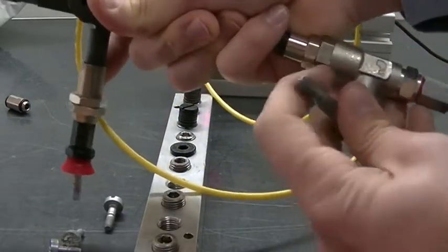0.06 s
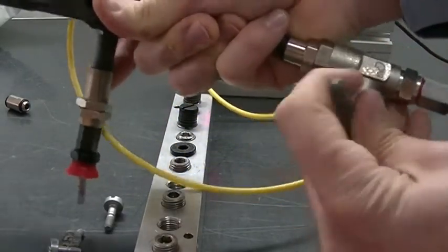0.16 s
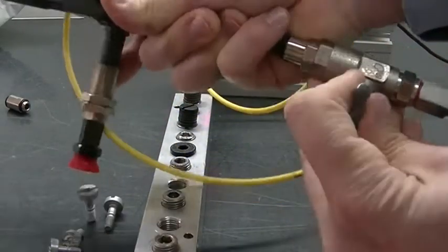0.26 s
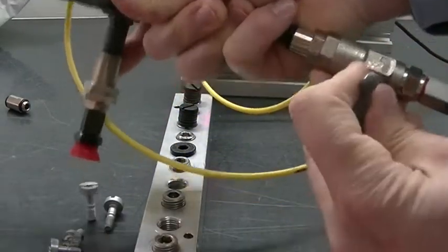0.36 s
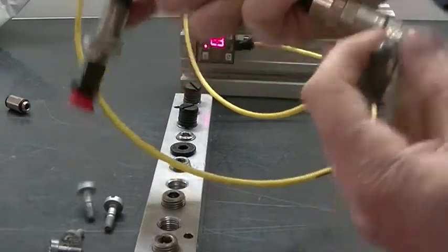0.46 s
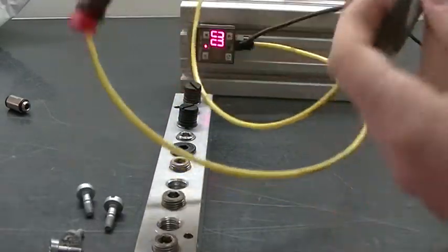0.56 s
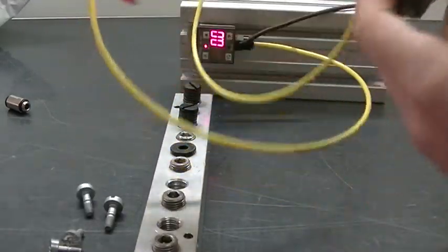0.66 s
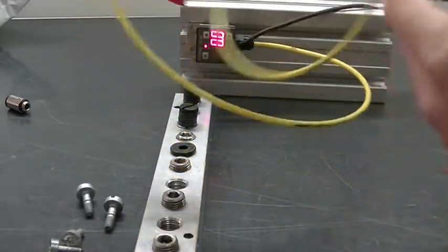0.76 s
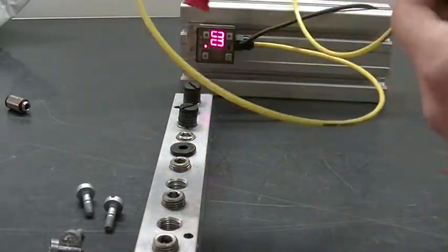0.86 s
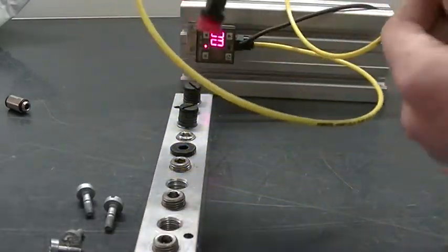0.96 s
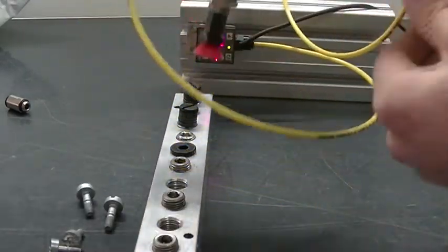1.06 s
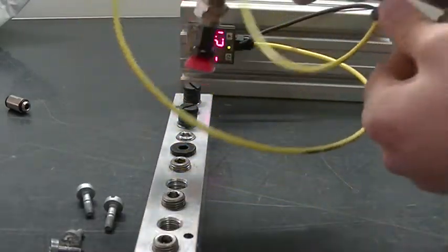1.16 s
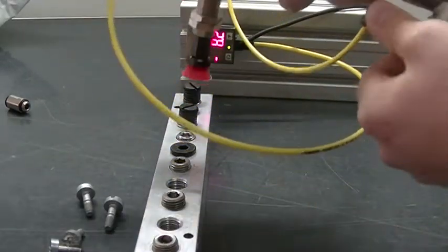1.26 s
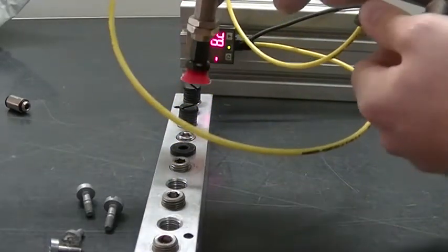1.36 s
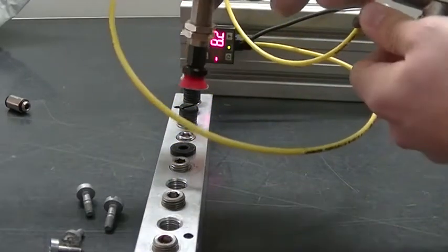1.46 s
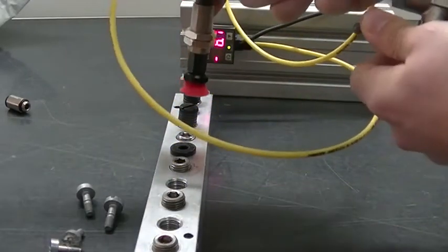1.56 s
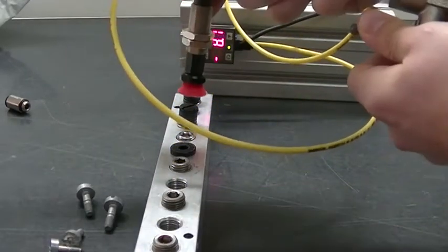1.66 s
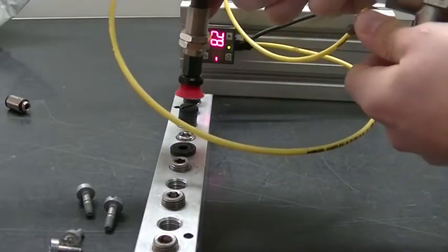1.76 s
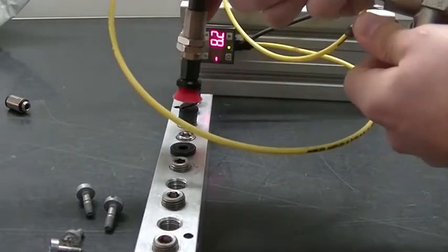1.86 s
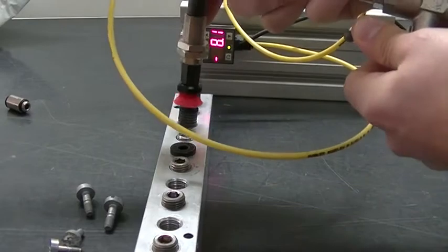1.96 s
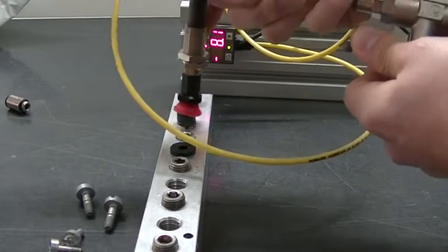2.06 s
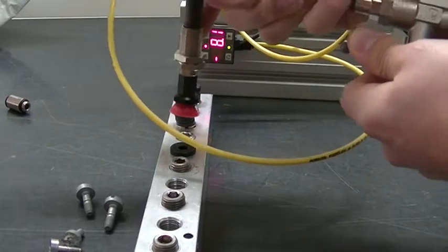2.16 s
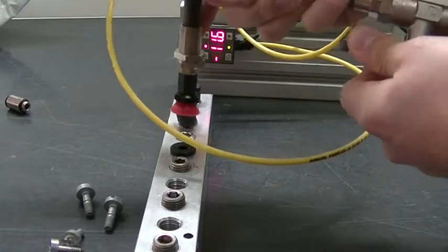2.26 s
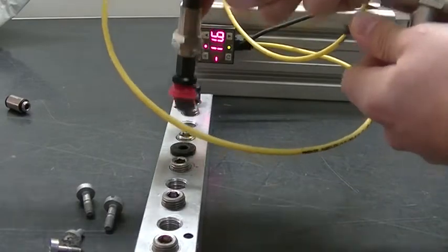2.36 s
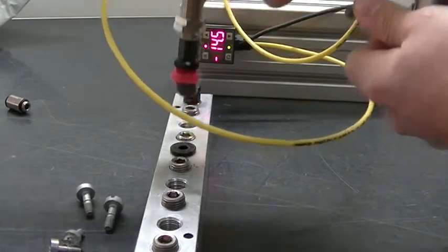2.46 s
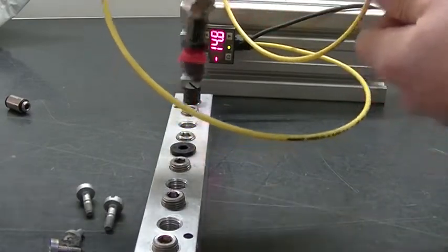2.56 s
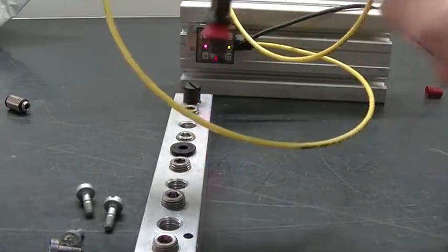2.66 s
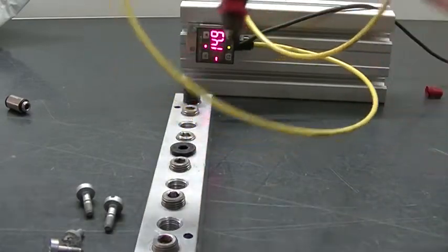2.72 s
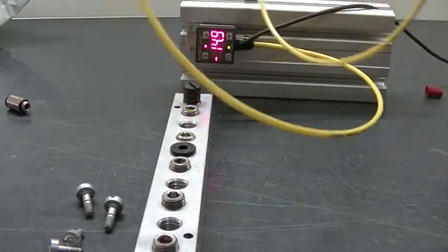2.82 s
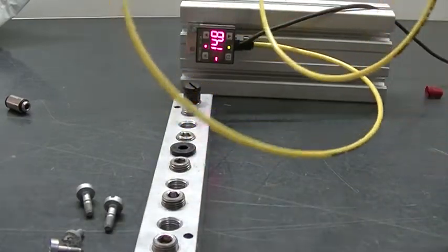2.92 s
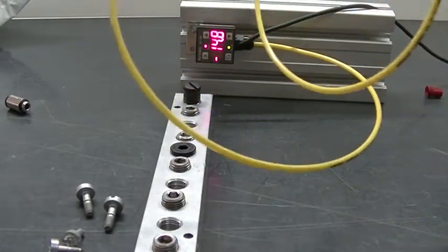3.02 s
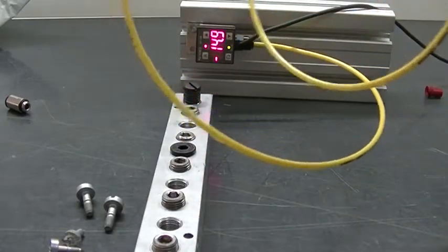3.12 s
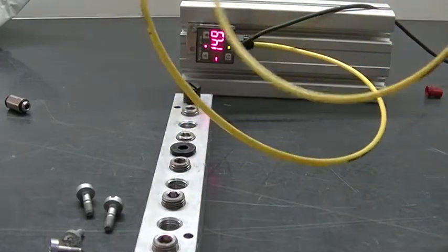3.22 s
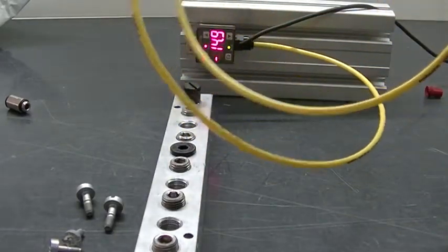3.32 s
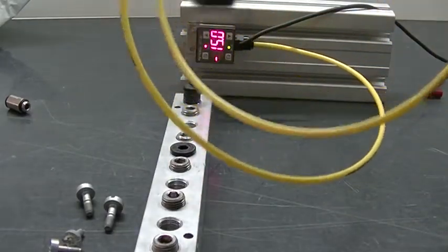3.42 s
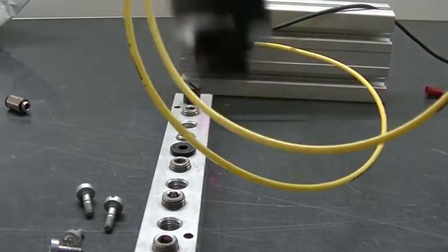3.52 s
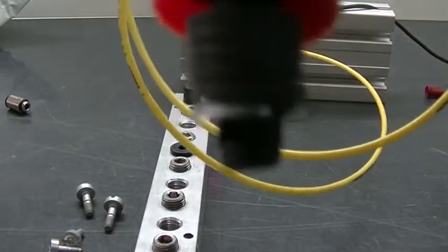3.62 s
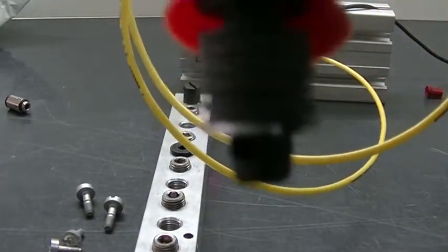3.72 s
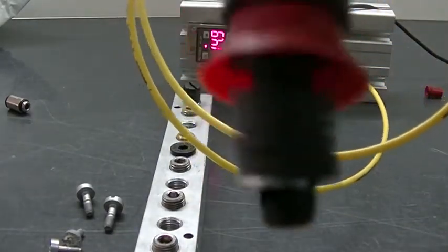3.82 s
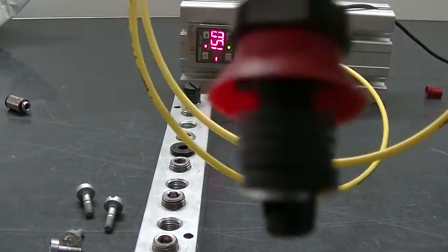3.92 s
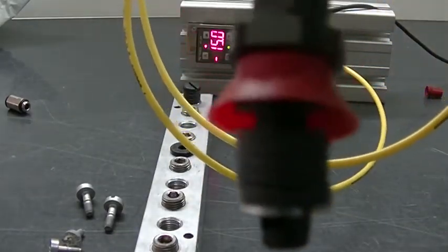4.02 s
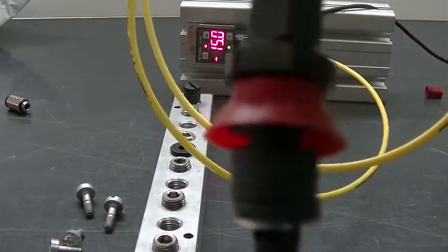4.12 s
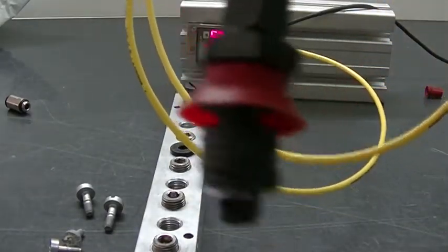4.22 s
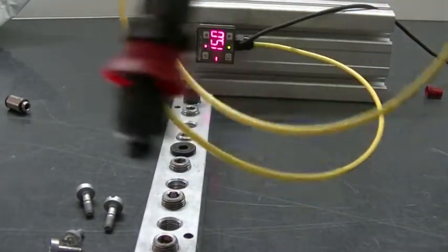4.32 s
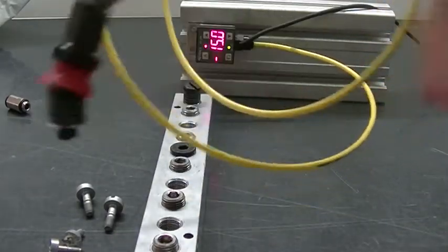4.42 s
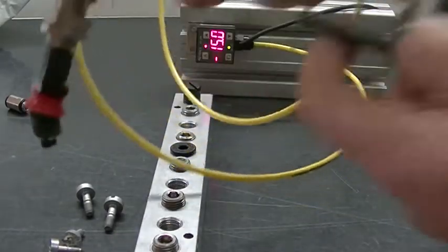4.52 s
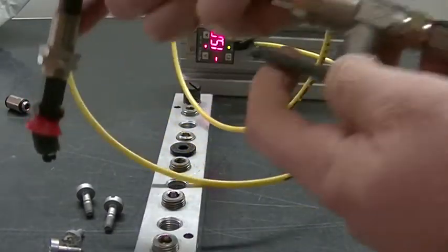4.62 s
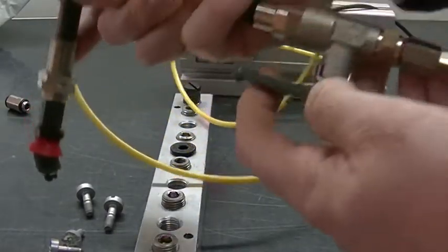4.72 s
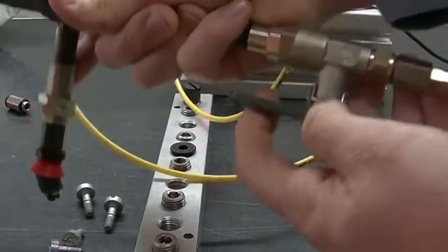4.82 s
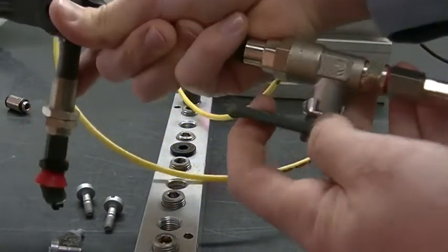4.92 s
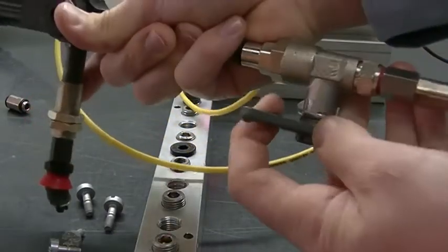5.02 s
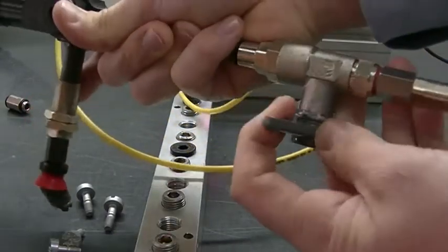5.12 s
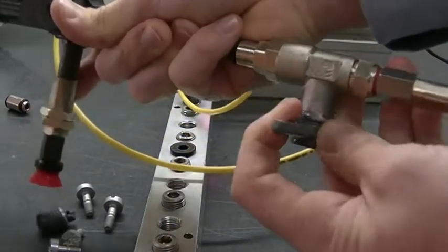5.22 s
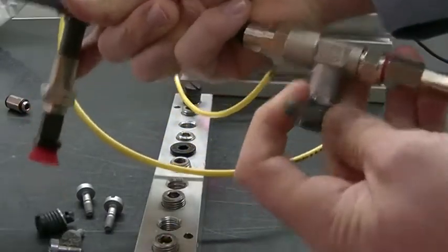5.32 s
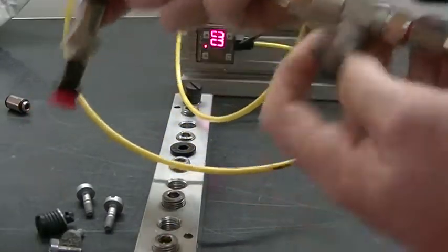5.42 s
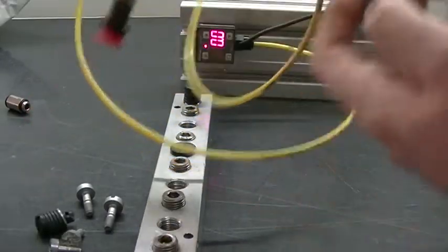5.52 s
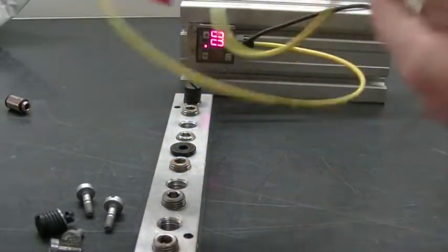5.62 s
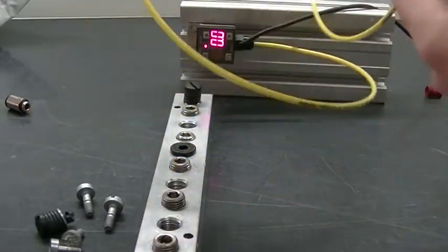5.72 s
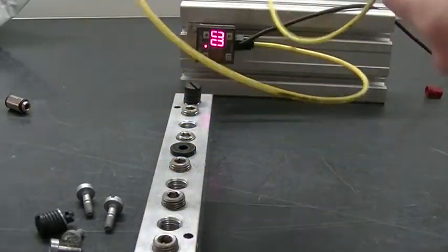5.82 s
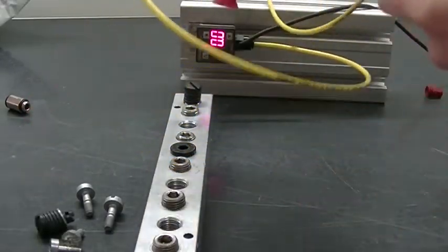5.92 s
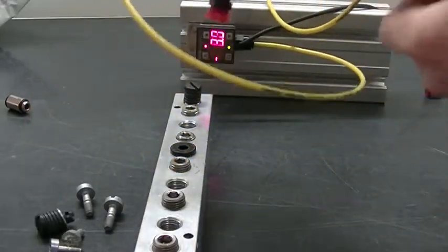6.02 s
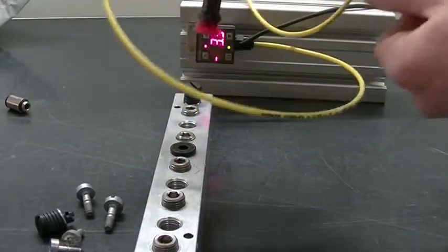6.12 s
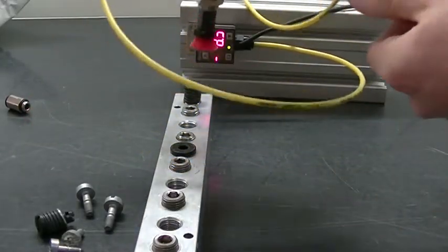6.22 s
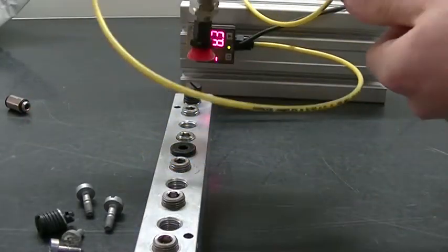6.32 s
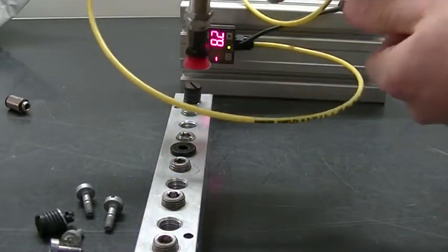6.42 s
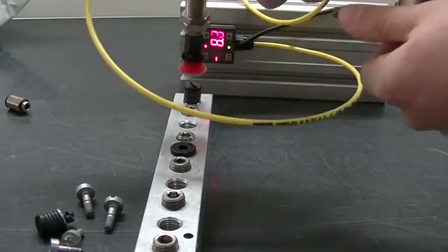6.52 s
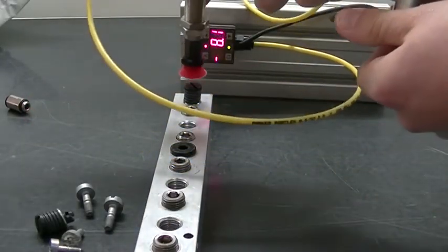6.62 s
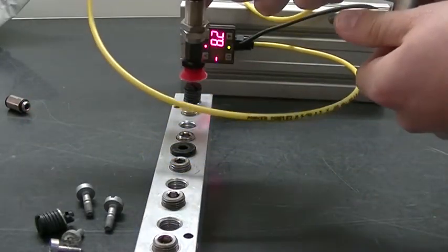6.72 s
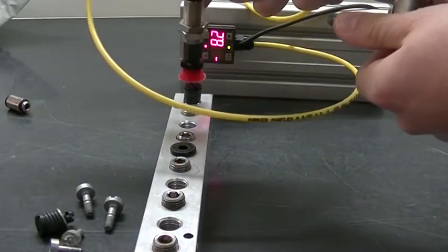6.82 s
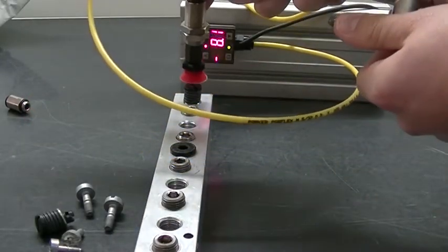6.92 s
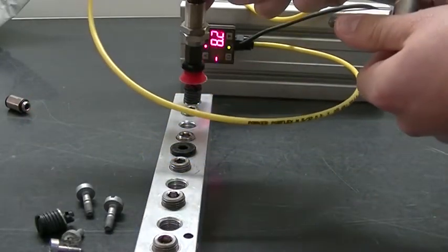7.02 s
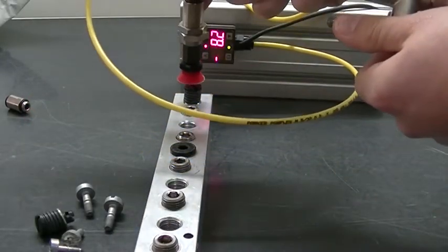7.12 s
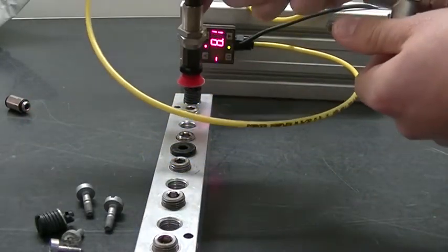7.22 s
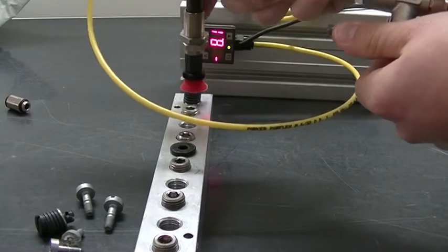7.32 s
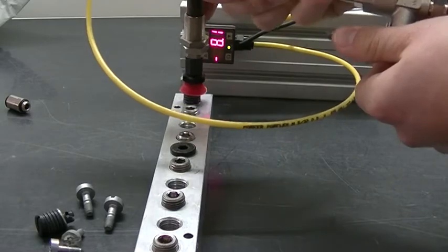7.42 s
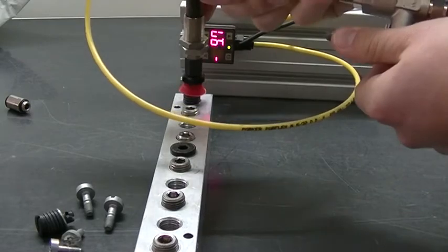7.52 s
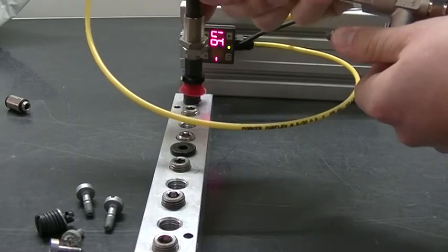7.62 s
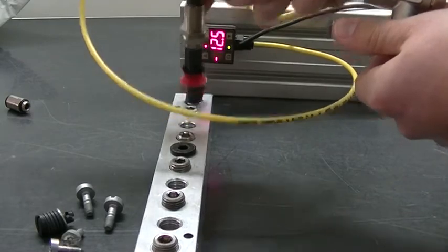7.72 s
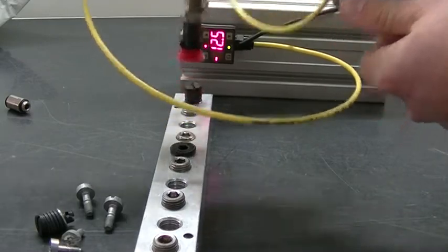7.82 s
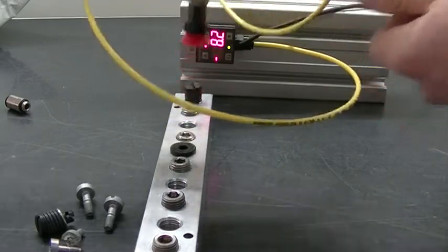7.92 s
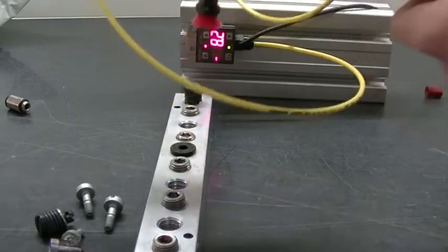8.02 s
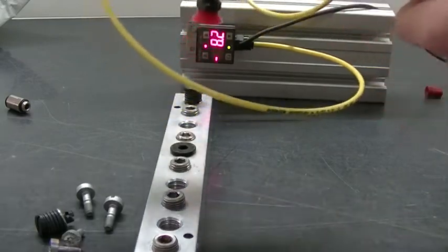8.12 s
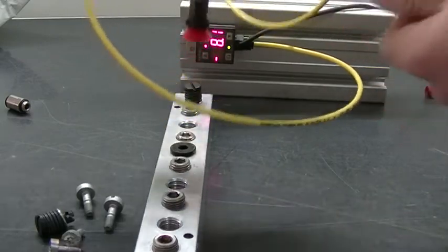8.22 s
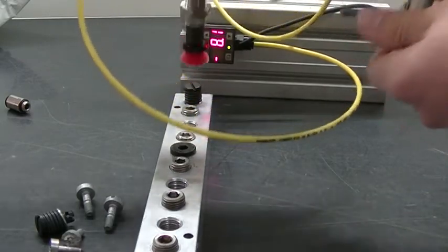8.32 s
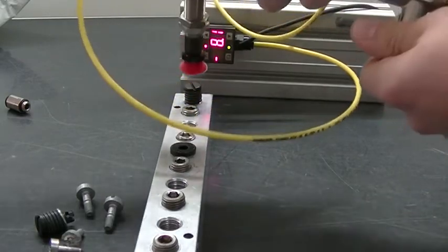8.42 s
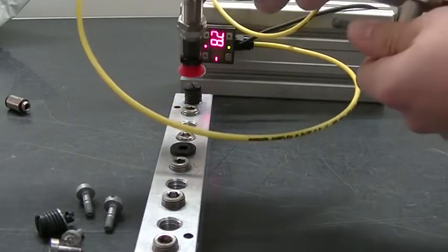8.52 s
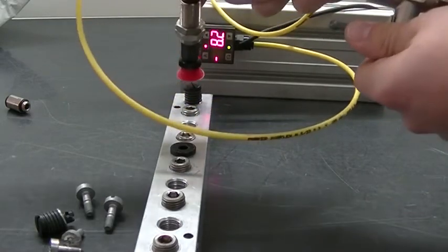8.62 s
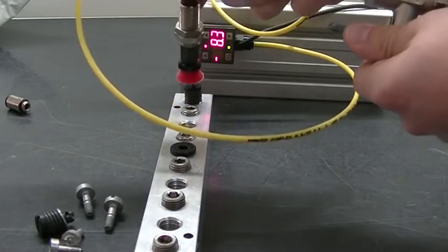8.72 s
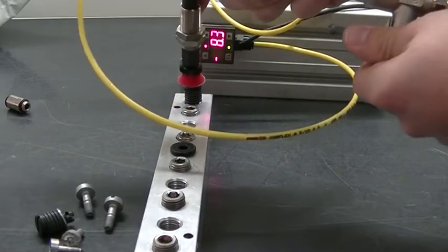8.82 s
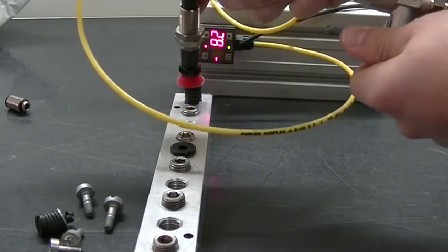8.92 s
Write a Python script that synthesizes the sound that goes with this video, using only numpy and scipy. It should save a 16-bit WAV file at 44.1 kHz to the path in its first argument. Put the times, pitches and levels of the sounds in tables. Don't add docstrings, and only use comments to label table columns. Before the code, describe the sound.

A loud, harsh compressed-air hiss is already blowing and chokes off at about 0.15 s. A small hard part cracks on the bench at 0.24 s with a soft bounce, a second at 0.49 s. Room ring fades into low ventilation rumble and faint mains hum, with tiny valve ticks from 0.6 to 0.8 s. At 1 s the jet bursts open with a bright spit and blows steadily, its tone sliding in hollow comb-like sweeps. Around 2.1 s it tightens with a slight squeak; from 3.4 to 4.2 s thin, airy treble swells very close, then recedes. It shuts with a metallic snap near 5.07 s; a part knocks at 5.19 s and bounces quickly. Fittings tick brightly at 5.5 to 5.85 s. At 5.95 s the hiss bursts back, shifts briefly at 7.4 to 7.6 s, brightens near 8.1 s and continues to the end.

```python
import sys
import numpy as np
from scipy import signal
from scipy.fft import rfft, irfft, next_fast_len
from scipy.io import wavfile
from scipy.ndimage import uniform_filter1d

SR = 44100
rng = np.random.default_rng(int(sys.argv[2]) if len(sys.argv) > 2 else 0)


def wav_out(sig):
    wavfile.write(sys.argv[1], SR, np.round(np.clip(np.atleast_2d(sig).T, -1, 1) * 32767).astype(np.int16))


def ratio(d):
    e = np.asarray(d, float) / 20
    return 10 ** e


N = 395577
M = next_fast_len(N)
T = np.arange(N) / SR

# opens_s, rise_s, shuts_s, fall_s
VALVE = [
    (-1, .01, .155, .006),
    (.987, .016, 5.076, .008),
    (5.949, .016, 10, .01),
]
# start_s, hand_delay_ms, hand_share, bench_delay_ms, block_delay_ms
CARRY = [(0, 0.37, 0.04, 2.47, 2.1), (.98, 0.43, .27, 2.4, 1.94), (1.3, 0.34, 0.25, 2.2, 2.16),
         (2.1, 0.32, 0.13, 2.22, 1.9), (2.62, 0.38, 0.21, 2.5, 2.02), (3.0, 0.6, .28, 2.85, 1.74),
         (3.35, 0.89, 0.15, 3.66, 1.8), (3.7, 1.07, 0.16, 4.1, 1.9), (4.15, 1.07, 0.14, 4.1, 1.97),
         (4.4, 0.67, 0.087, 3.5, 1.8), (4.7, 0.36, .18, 2.6, 2.3), (5.08, 0.23, 0.35, 2.57, 2),
         (5.95, 0.44, 0.29, 1.79, 1.67), (6.5, 0.32, 0.16, 1.94, 1.9), (7.65, 0.31, 0.05, 1.95, 1.75),
         (8.1, 0.44, 0.39, 2.4, 2.45), (8.45, 0.35, 0.26, 2.11, 2.01), (8.97, 0.3, 0.15, 2.21, 1.83)]


def unit(x):
    return x / np.sqrt(np.mean(x ** 2))


def curves(tables):
    s, *columns = np.concatenate(tables).T
    return [np.interp(T, s, column) for column in columns]


def log_curve(points, size):
    hz, value = np.transpose(points)
    return np.interp(np.log(np.fft.rfftfreq(size, 1 / SR) + 1), np.log(hz), value)


def colour(x, points):
    return irfft(rfft(x, M) * ratio(log_curve(points, size=M)), M)[:N]


def split(x, edges_hz):
    octave = np.log2(np.fft.rfftfreq(M, 1 / SR) + 1)
    spectrum = rfft(x, M)
    slopes = [np.clip(.5 - (octave - np.log2(hz)) / .3, 0, 1) for hz in edges_hz]
    below = [0] + slopes + [1]
    return [irfft(spectrum * (hi - lo), M)[:N] for lo, hi in zip(below, below[1:])]


def late(x, ms):
    return np.interp(np.arange(N) - ms * SR / 1000, np.arange(N), x)


def walk(rate_hz):
    hold = int(SR / rate_hz)
    steps = np.repeat(rng.standard_normal(N // hold + 1), hold)
    return unit(uniform_filter1d(uniform_filter1d(steps, hold), hold)[:N])


def pan(db):
    return ratio(np.array([db / 2, -db / 2]))


def mid_side(side):
    return side * np.array([[1], [-1]])


def ring(t, hz, t60_s):
    return np.sin(2 * np.pi * hz * t) * np.exp(-np.log(1000) * t / t60_s)


def add(out, s, sound):
    i = int(s * SR)
    out[:, i:i + sound.shape[-1]] += sound


def valve():
    return sum(np.clip((T - on) / rise, 0, 1) * np.exp(-np.clip(T - off, 0, None) / fall)
               for on, rise, off, fall in VALVE)


def air(flow):
    bands_hz = [620, 1350, 2650, 4250, 6900, 9900]
    side_share = [0.046, 0.11, 0.14, 0.1, 0.28, 0.46, 0.72]
    spread_db, pan_db, pan_db_per_ms = -15, 2.2, .85
    mids = split(echoes(rng.standard_normal(N)), bands_hz)
    sides = split(nozzle(rng.standard_normal(N), []), bands_hz)
    spread = ratio(spread_db) * unit(sum(sides)) * flow
    out = 0
    for mid, side, db, share in zip(mids, sides, region_levels(), side_share):
        loudness = np.sqrt(uniform_filter1d(mid ** 2, size=SR // 2))
        out = out + ratio(db + .5 * walk(14.)) * (mid / loudness + share * mid_side(unit(side)))
    bench_ms = curves([CARRY])[2]
    out = out * pan(pan_db + pan_db_per_ms * (bench_ms - 2)) * flow
    return out + puffs(), spread


def echoes(jet):
    # delay_ms, share_low (over bench), share_lifted
    hand_steps = [(0.0069, 1., 1.27), (-0.12, -0.92, 0), (0.16, -0.26, 0.54)]
    # delay_ms, share
    rail = [(0, 0.81), (.11, 0.72), (.22, 1.1), (.35, -.8)]
    # delay_ms, share
    still = [(.46, -0.054), (0.582, 0.22), (0.701, -0.1), (.95, 0.028), (4.56, 0.01), (5.17, 0.15),
             (5.4, 0.082)]
    # peak_hz, width_hz, level_db
    low_peaks = [(240.7, 35, 9), (448, 56, 5.5), (1017, 21, 5.5), (2086, 260, 4), (3260, 160, -1),
                 (4090, 860, -5), (5290, 100, 3), (5930, 1300, 6.5), (10840, 570, 8)]
    # peak_hz, width_hz, level_db
    lifted_peaks = [(494, 180, -13), (795, 310, 4.5)]
    rail_top_hz, bench_share, bench_fade = 6500, 0.14, 0.33
    block_share, clutter_share = -0.18, 0.087
    hand_ms, hand, bench_ms, block_ms = curves([CARRY])
    lift = np.clip(np.maximum((hand_ms - .42) / .25, (bench_ms - 2.34) / .15), 0, 1)
    dull = signal.filtfilt(*signal.butter(2, rail_top_hz, fs=SR), jet)
    out = jet + block_share * late(jet, block_ms)
    out += hand * sum((low + (high - low) * lift) * late(jet, hand_ms + ms) for ms, low, high in hand_steps)
    bench = sum(share * late(dull, bench_ms + ms) for ms, share in rail)
    out += bench_share * (1 - bench_fade * lift) * bench
    for place, stretch, sign in rng.random((22, 3)):
        path_ms = 1 + 11 * place + 1.4 * stretch * (bench_ms - 1.7)
        out += clutter_share * np.sign(sign - .5) * late(dull, path_ms)
    near = out + sum(share * late(jet, ms) for ms, share in still)
    return (1 - 0.71 * lift) * nozzle(near, low_peaks) + 0.58 * lift * nozzle(out, lifted_peaks)


def nozzle(x, peaks):
    # freq_hz, level_db_per_hz
    exhaust = [(76, -69), (130, -38), (277, -23.5), (466, -11.5), (515, -7), (956, -2), (1080, -2.5),
               (2080, 0.5), (4270, 2), (5210, -7.5), (9670, -28.5), (11100, -29), (15300, -31)]
    top_hz = 15330
    hz = np.fft.rfftfreq(M, 1 / SR)
    resonance_db = sum(g / (1 + (2 * (hz - f) / width) ** 2) for f, width, g in peaks)
    db = log_curve(exhaust, size=M) + resonance_db
    return irfft(rfft(x, M) * ratio(db) * (hz < top_hz), M)[:N]


def region_levels():
    # start_s, turned_up (-0.3 to 1), fingers_over (0-1)
    wrist = [(.04, 0.5, .6), (.11, 0.1, 0.8), (1.02, 0.64, 0.55), (1.1, 1, 0.4), (1.5, 0.26, 0),
             (2.0, 0.25, 0.24), (2.25, 0, 0.65), (2.55, 0.46, 0), (2.85, 0.67, 0.6), (3.2, 0, 0.55),
             (4.45, 0.32, 0.74), (5.03, 0.03, 0.32), (5.99, 0.5, 0.3), (6.2, 0.58, .3), (7.3, 0, 0.46),
             (7.6, -.3, 0.42), (8.1, 1, 0.48), (8.6, 0, 0.52)]
    # touches_s, lets_go_s, tightness (0-1), squeak_db
    seals = [
        (0.11, 0.206, 0.4, 8),
        (2.089, 4.91, 0.96, 4),
        (7.43, 7.64, 0.68, 2),
    ]
    # start_s, nearness (0-1)
    approach = [
        (2.3, 0.07),
        (2.95, 0.39),
        (3.4, 0.78),
        (3.72, 1),
        (4.26, 0.62),
        (4.45, 0.24),
    ]
    # rest_db, then change_db if sealed, turned, near, covered
    regions = [
        (-32, -4.5, -2, -2.5, -2.5),
        (-24, -4.5, -3.5, 4, 0),
        (-20, -3, 3, 0.5, 1),
        (-18.5, 1.5, -2.5, -2.5, -0.5),
        (-21, 0, 2, -0.5, -5.5),
        (-32, -8, 0.5, -3.5, -2.5),
        (-46, 0, 1, 18.5, -2),
    ]
    squeak_share = [0, 0, 0, 0, 0, .8, 1]
    opening_db = [3.5, -1.5, -1, 2.5, 3.5, 0.5, 5]
    closing_db = [-2, -2, -6.5, -1.5, -3, -3, 0]
    seal_s, squeak_s, settle_s, closing_s = 0.15, 0.034, 0.077, 0.14
    (turn, cover), (near,) = curves([wrist]), curves([approach])
    seal = sum(tight * np.clip(np.minimum(T - on, off + seal_s - T) / seal_s, 0, 1)
               for on, off, tight, _ in seals)
    squeak_db = sum(db * np.exp(-((T - on) / squeak_s) ** 2) for on, _, _, db in seals)
    fresh = sum((T > on) * np.exp(-np.abs(T - on - rise) / settle_s) for on, rise, _, _ in VALVE)
    closing = sum(np.clip(1 - np.abs(off - T) / closing_s, 0, 1) for _, _, off, _ in VALVE)
    levels_db = []
    for (rest, *change), share, fresh_db, sag_db in zip(regions, squeak_share, opening_db, closing_db):
        handling_db = np.dot(change, [seal, turn, near, cover])
        levels_db.append(rest + handling_db + share * squeak_db + fresh_db * fresh + sag_db * closing)
    return levels_db


def puffs():
    # start_s, level_db, centre_hz, length_s
    spits = [
        (0.988, -16, 8600, 0.024),
        (5.953, -16.5, 8340, 0.024),
    ]
    # start_s, level_db, pitch_hz
    thumps = [
        (.995, -40, 200),
        (5.075, -36, 110),
        (5.959, -36, 190),
    ]
    out, t = np.zeros((2, N)), np.arange(int(.05 * SR)) / SR
    for s, db, hz, length in spits:
        band = signal.butter(2, [hz - 900, hz + 900], "bandpass", fs=SR, output="sos")
        puff = unit(signal.sosfilt(band, rng.standard_normal(len(t))))
        envelope = np.clip(t / 0.005, 0, 1) * np.exp(-(t / length) ** 2)
        add(out, s, ratio(db) * puff * envelope * pan(4.0)[:, None])
    fade = np.hanning(2 * len(t))[len(t):]
    for s, db, hz in thumps:
        add(out, s, ratio(db) * ring(t, hz, .09) * np.clip(t / 0.003, 0, 1) * fade)
    return out


def drops():
    # start_s, peak_db, knock_hz, crack_db, left_minus_right_db
    impacts = [
        (0.2423, -3, 2040, 2.5, 4.5),
        (0.265, -22, 2070, -16, 0),
        (0.4904, -4, 2020, 0.5, 2),
        (0.5171, -13.5, 1970, -17, 4),
        (5.1904, -2, 2030, 0, 4.5),
        (5.205, -15, 2240, -7, -2),
        (5.2158, -6.5, 2250, 1.5, 4.5),
    ]
    # freq_hz, level_db_per_hz
    bench = [(300, -10), (800, 6), (1550, -9), (2400, 0), (4000, -5.5), (8000, -21), (11000, -24),
             (15000, -42)]
    # delay_ms, share
    bench_echo = [(2.6, 0.15), (5.6, 0.09), (9.8, .1)]
    # start_s, level_db, pitch_hz
    snap = (5.0672, -6, 3900)
    out, body, t = np.zeros((2, N)), np.zeros((2, N)), np.arange(int(.1 * SR)) / SR
    noise = unit(colour(rng.standard_normal(N), bench))
    rattle_env = ratio(-9) * np.exp(-t / 0.0018) + ratio(-16.0) * np.exp(-t / 0.0065)
    crack = ring(t, 5200, 0.0014) + ring(t, 6700, 0.001) + 0.28 * ring(t, 12700, 0.00082)
    bench_modes = ring(t, 496, 0.13) + ring(t, 260, 0.045)
    for s, db, hz, crack_db, pan_db in impacts:
        knock = 1.3 * ring(t, hz, 0.0055) + 0.22 * ring(t, 1600, 0.027)
        repeats = sum(share * np.roll(knock, int(ms * SR / 1000)) for ms, share in bench_echo)
        blow = knock + ratio(crack_db) * crack + repeats
        rattle = noise[int(s * SR):][:len(t)] * rattle_env
        add(out, s + 0.00125, ratio(db) * (blow + rattle) * pan(pan_db)[:, None])
        add(body, s + 0.0024, ratio(db - 33.5) * bench_modes)
    s, db, hz = snap
    add(out, s, ratio(db) * ring(t, hz, 0.021) * pan(3.0)[:, None])
    return signal.sosfilt(signal.butter(2, 1200, "highpass", fs=SR, output="sos"), out) + body


def ticks():
    # start_s, peak_db, pitch_hz, t60_s
    taps = [(0.628, -34, 2760, 0.037), (0.771, -30, 3020, 0.03), (0.808, -24.5, 2050, 0.022),
            (0.9298, -49, 2800, 0.038), (5.5314, -40, 2010, 0.027), (5.5431, -21.5, 6100, 0.023),
            (5.656, -27, 4870, 0.012), (5.7046, -29.5, 2000, 0.03), (5.835, -20.5, 6570, 0.04),
            (5.8392, -23.5, 6770, 0.065)]
    # start_s, end_s, level_db
    scrape = (.756, .782, -47)
    out, t = np.zeros((2, N)), np.arange(int(.1 * SR)) / SR
    band = signal.butter(1, [2200, 9000], "bandpass", fs=SR, output="sos")
    scratch_env = np.exp(-t / 0.00089) + 0.12 * np.exp(-t / 0.0096)
    for s, db, hz, t60 in taps:
        scratch = signal.sosfilt(band, rng.standard_normal(len(t))) * scratch_env
        metal = ring(t, hz, t60) + .6 * ring(t, .88 * hz, t60)
        add(out, s, ratio(db) * (.8 * scratch + .3 * metal) * pan(2.2)[:, None])
    start, end, db = scrape
    slide = np.clip(np.minimum(T - start, end - T) / 0.0044, 0, 1)
    return out + ratio(db) * slide * np.diff(rng.standard_normal(N + 1))


def room(x):
    # freq_hz, t60_s
    room_t60 = [(200, 2.5), (1000, 1.11), (3000, 0.97), (7000, 0.57), (15000, 0.45)]
    t = np.arange(2 * SR) / SR
    _, frame_s, z = signal.stft(rng.standard_normal((3, len(t))), SR, nperseg=512)
    z = z * ratio(-60 * frame_s / log_curve(room_t60, size=512)[:, None])
    tail = signal.istft(z, SR, nperseg=512)[1][:, :len(t)] * np.clip((t - .004) / .01, 0, 1)
    tail = tail[0] + 0.38 * tail[1:]
    tail = tail / np.sqrt(np.mean(np.sum(tail ** 2, axis=1)))
    return signal.fftconvolve(x[None], tail, axes=1)[:, :N]


def reverberation(spread, hits):
    # freq_hz, level_db
    room_colour = [(200, 1), (1100, -3), (1750, 2.5), (2600, -2), (4100, -2), (5300, 1.5), (7500, -3.5),
                   (15000, -9)]
    room_db, drop_room_db = -18, -24.5
    before = np.roll(spread, SR)
    delayed_hits = np.r_[np.zeros(SR), hits.mean(axis=0)[:-SR]]
    feed = ratio(room_db) * before + ratio(drop_room_db) * delayed_hits
    ringing = room(colour(feed, room_colour))[:, SR:]
    return np.c_[ringing, ringing[:, -SR:]] * pan(2.5)[:, None]


def shop():
    # freq_hz, level_db_per_hz
    shop_noise = [(15, -40), (30, -18), (100, -10), (200, -13), (300, -13), (450, -10.5), (600, -18.5),
                  (1200, -23), (2000, -26), (5300, -29.5), (9500, -40.5), (15000, -48)]
    # pitch_hz, level_db
    mains = [(59.5, -70.5), (118.5, -55.5)]
    shop_db = -47.5
    mid, side = (unit(colour(rng.standard_normal(N), shop_noise)) for _ in range(2))
    hum = sum(ratio(db + 4 * walk(22.)) * np.sqrt(2) * np.sin(2 * np.pi * hz * T) for hz, db in mains)
    return (ratio(shop_db) * (mid + 0.32 * mid_side(side)) + hum) * pan(1.3)[:, None]


def scene():
    duck_db, release_s = 11.5, 0.39
    flow = valve()
    jet, spread = air(flow)
    hits = drops()
    keep = np.exp(-1 / (release_s * SR))
    recent = signal.lfilter([1 - keep], [1, -keep], flow, zi=[keep])[0]
    gain = ratio(-duck_db * np.maximum(flow, recent))
    surroundings = ratio(duck_db) * reverberation(spread, hits) + shop()
    return jet + hits + ticks() + gain * surroundings


def top_cut(x):
    return signal.sosfilt(signal.butter(12, 16530, fs=SR, output="sos"), x)


def record(dry):
    lowpass = signal.butter(10, 16000, fs=SR, output="sos")
    mix = np.clip(signal.sosfilt(lowpass, np.clip(dry, -1.05, 1.05)), -1, 1)
    return top_cut(mix)


dry = scene()
out = record(dry)
wav_out(out)
```